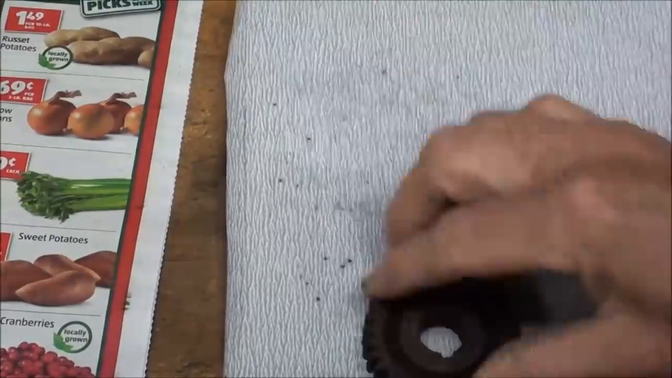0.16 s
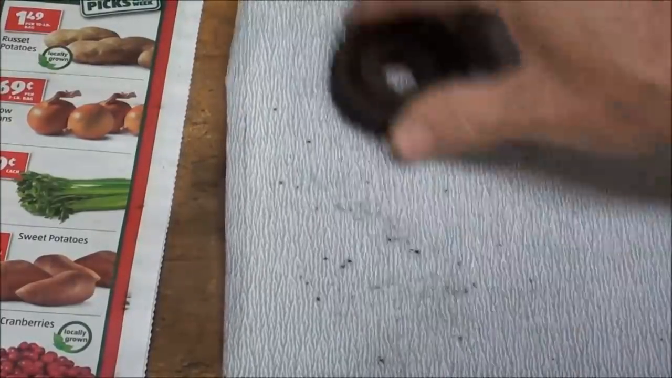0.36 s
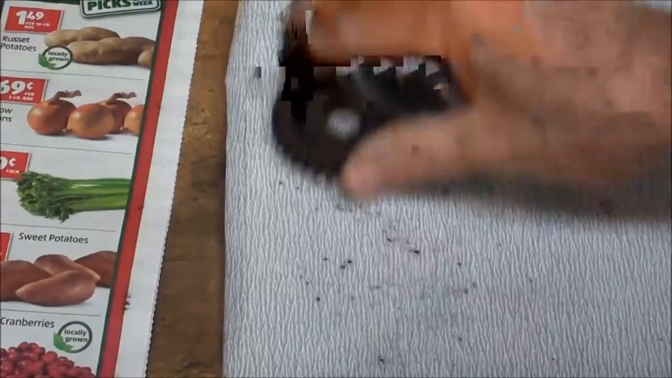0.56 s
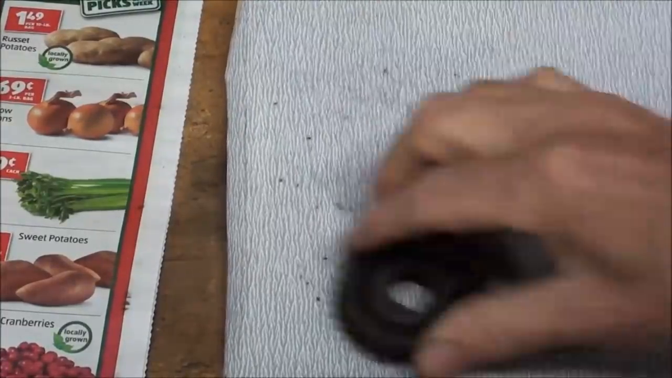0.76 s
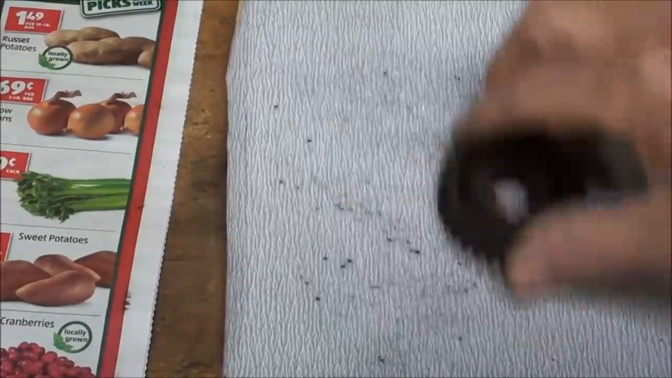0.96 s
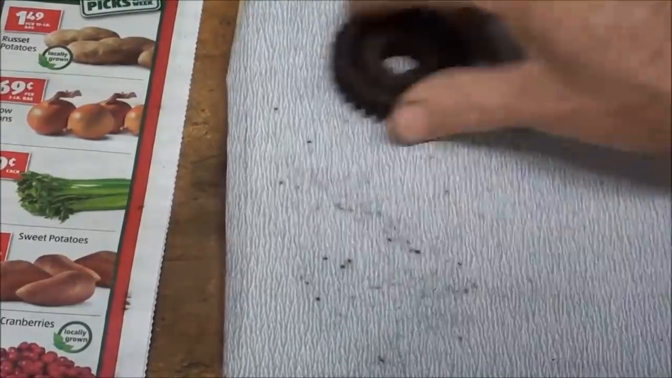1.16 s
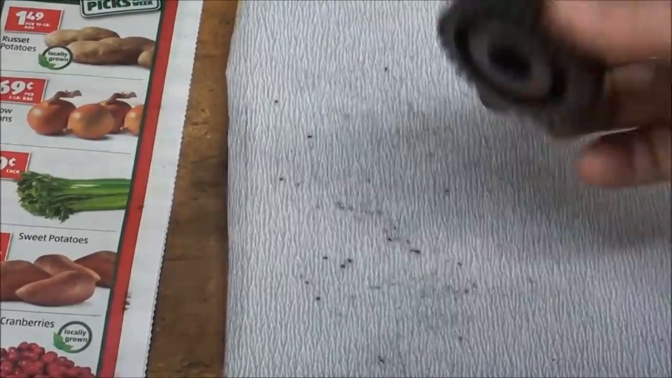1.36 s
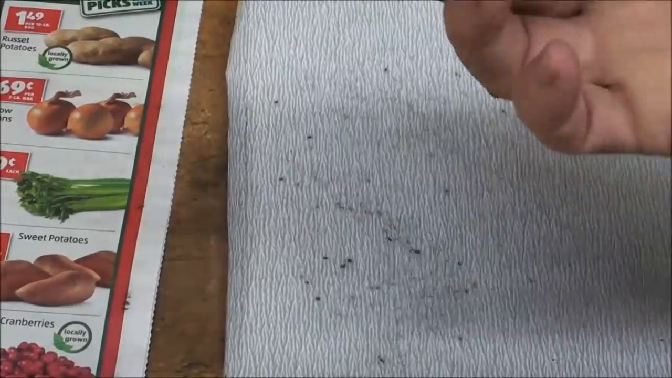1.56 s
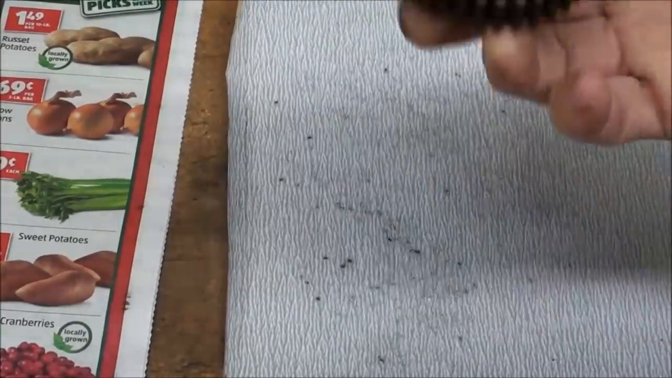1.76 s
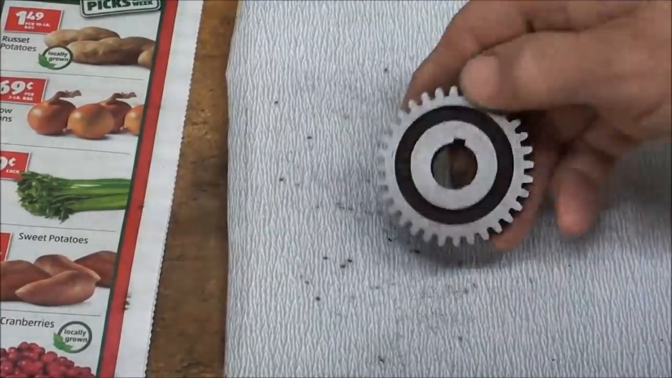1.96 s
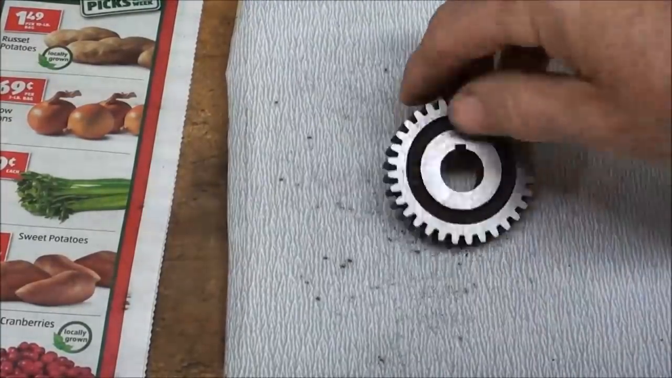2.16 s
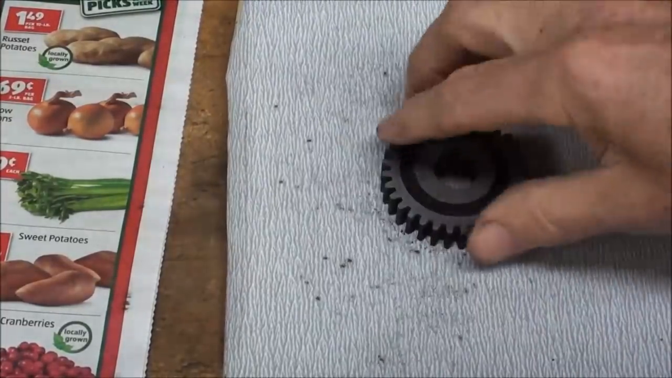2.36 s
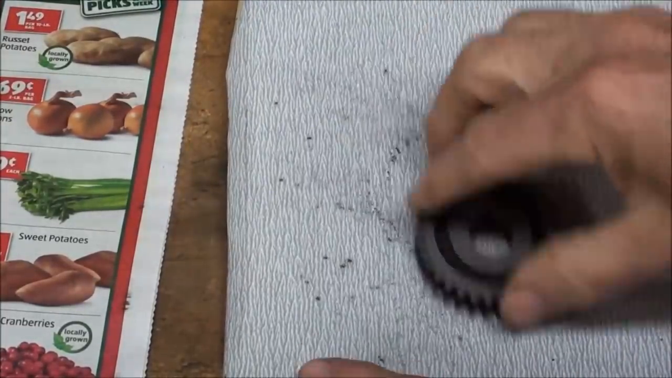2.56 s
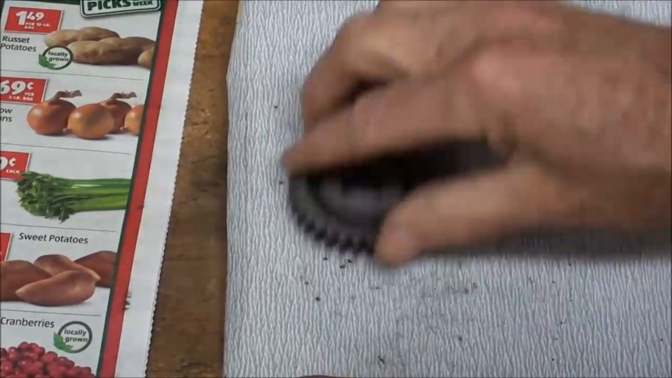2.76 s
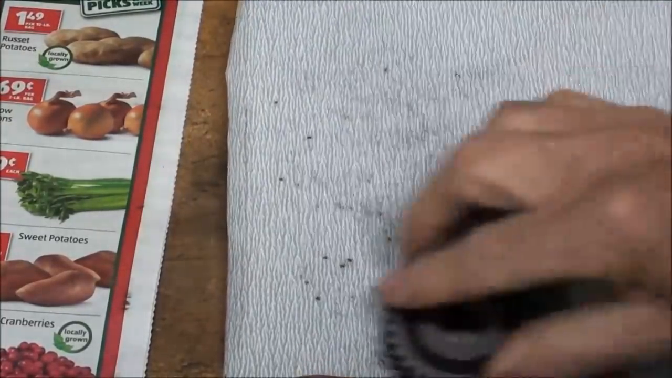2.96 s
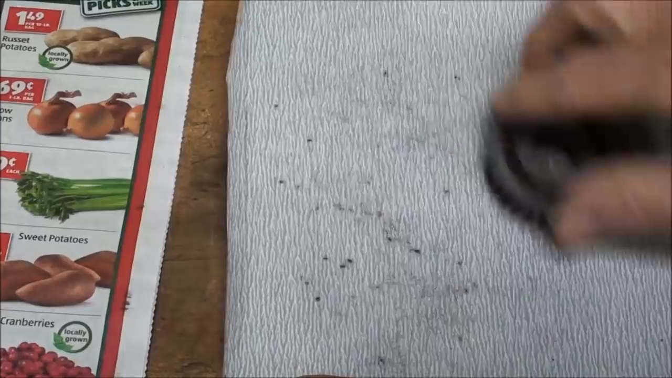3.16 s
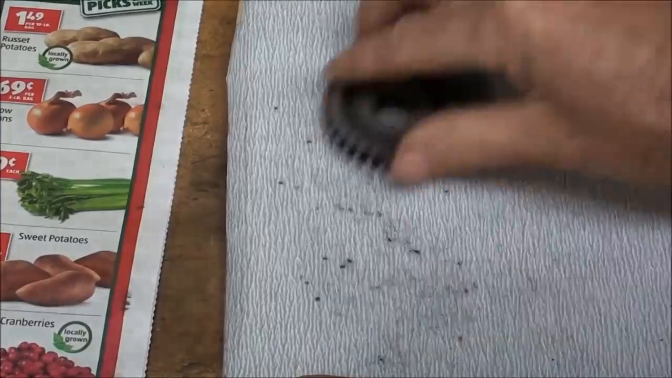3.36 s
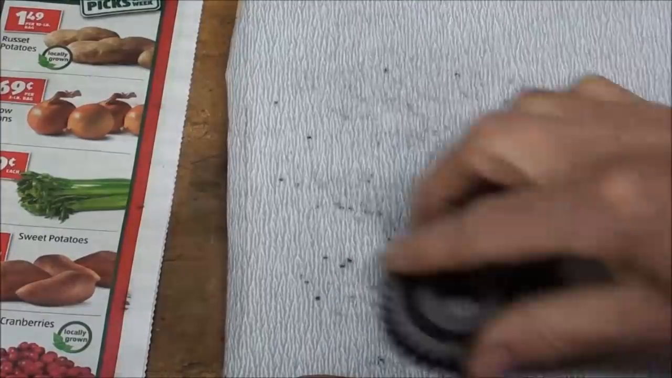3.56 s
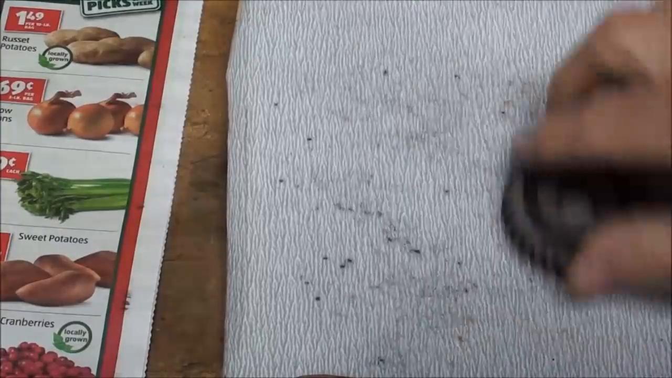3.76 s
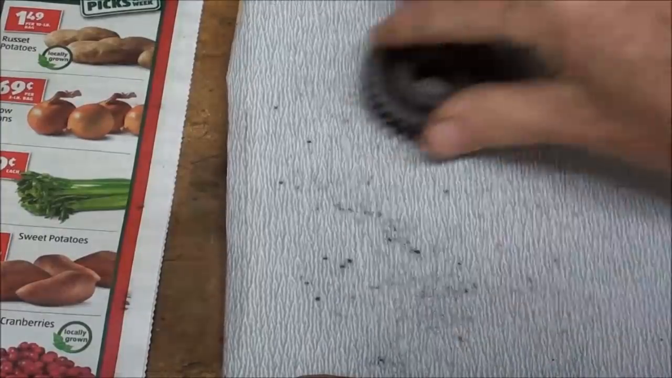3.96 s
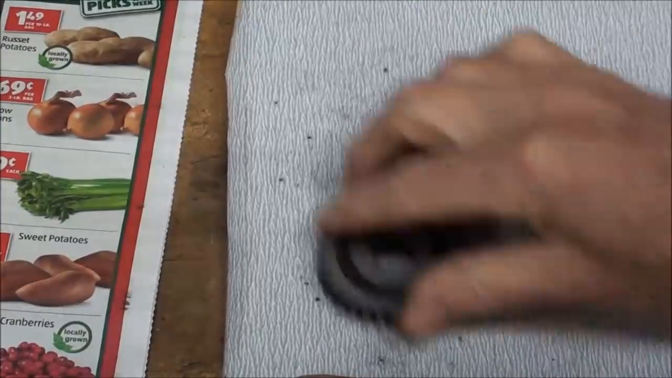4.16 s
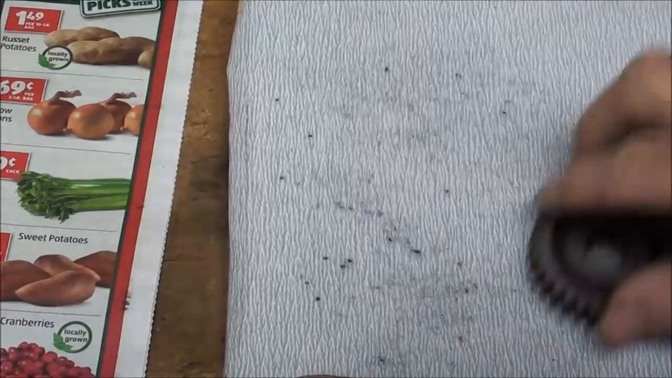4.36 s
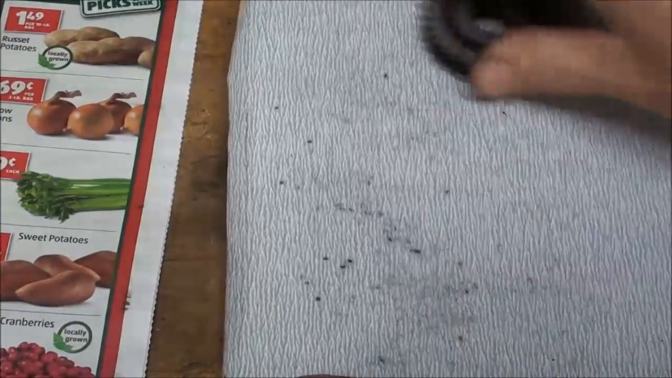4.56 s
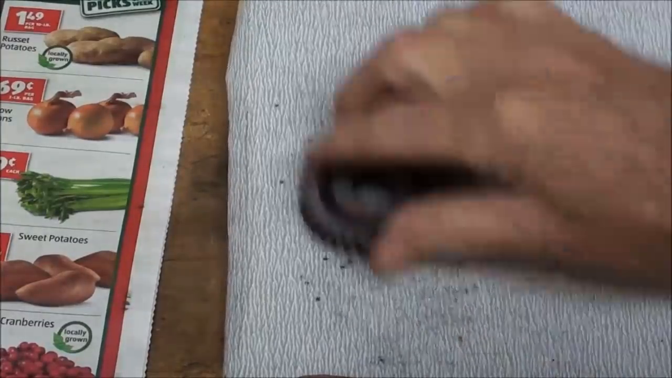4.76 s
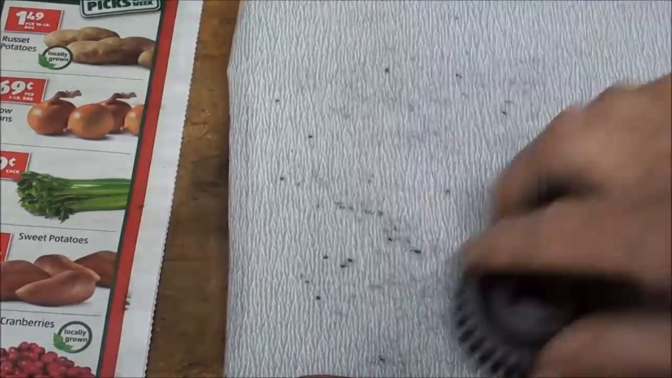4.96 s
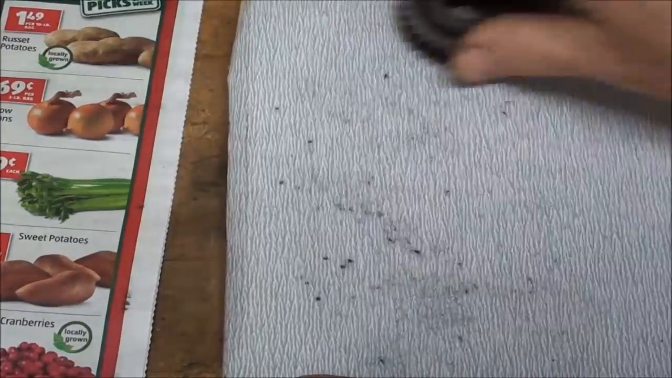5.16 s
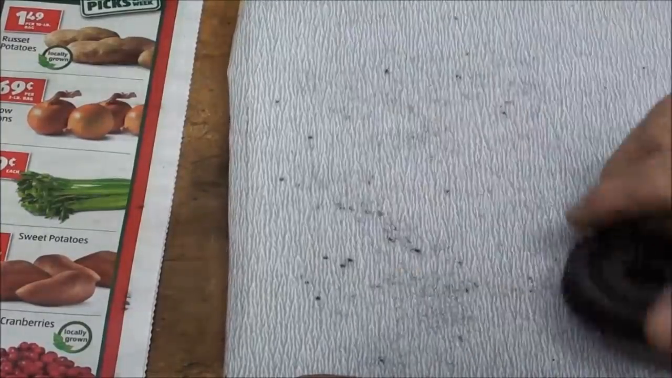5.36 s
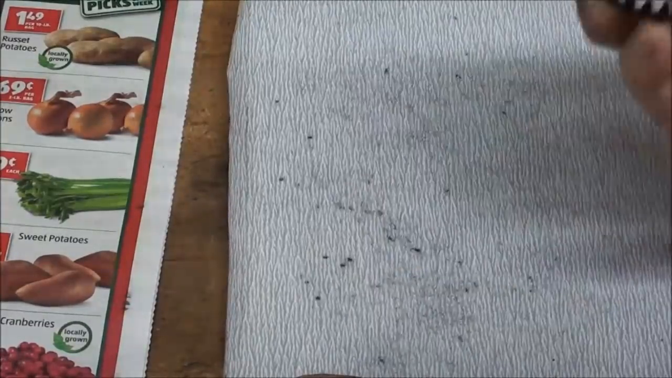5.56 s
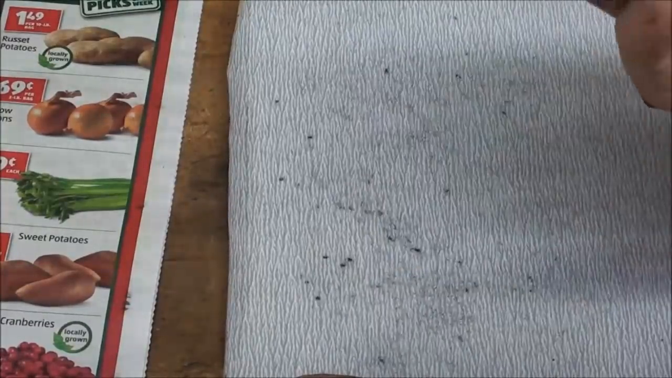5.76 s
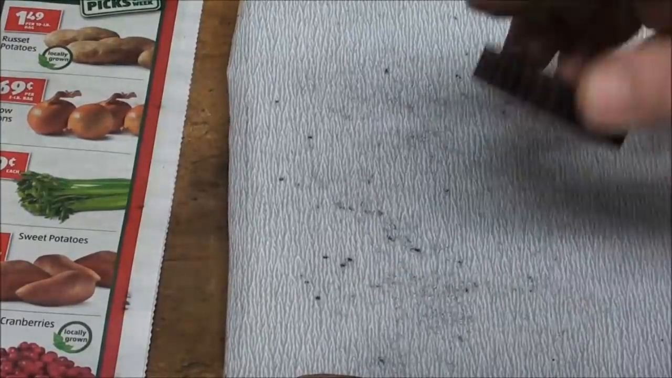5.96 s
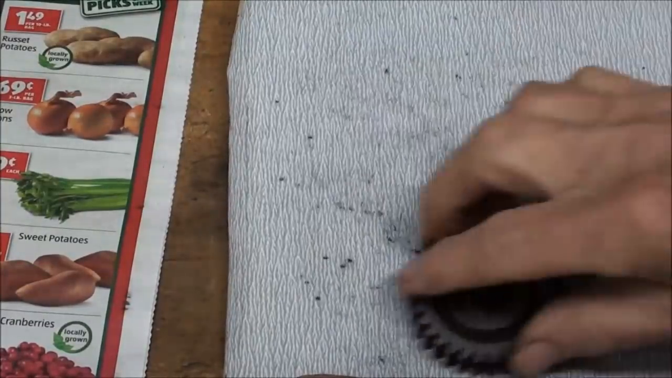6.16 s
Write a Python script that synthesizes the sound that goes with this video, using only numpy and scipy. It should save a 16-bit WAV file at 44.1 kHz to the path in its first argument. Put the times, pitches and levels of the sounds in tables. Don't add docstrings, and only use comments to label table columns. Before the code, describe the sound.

A cast iron gear scrapes in bright, gritty circles on sandpaper, is lifted, knocks back down on a wooden bench, and scrapes again.

```python
import sys
import numpy as np
from scipy import signal
from scipy.fft import rfft, irfft, next_fast_len
from scipy.io import wavfile
from scipy.ndimage import uniform_filter1d, map_coordinates

SR = 44100
rng = np.random.default_rng(int(sys.argv[2]) if len(sys.argv) > 2 else 0)


def volts_from_db(level):
    exponent = np.asarray(level, float) / 20
    return 10 ** exponent


def master(y):
    cut = np.clip(np.atleast_2d(y).T, -1, 1)
    pcm = np.round(cut * 32767)
    wavfile.write(sys.argv[1], SR, pcm.astype(np.int16))


N = 274743
TIME = np.arange(N) / SR

# time_s, pressure_db, speed_db
RUBS = [
    [(0, -14.5, -3), (.15, -14.5, -2.5), (.6, -14, -4.5), (1.24, -15, -5), (1.275, -20.5, -10),
     (1.31, -65, -18)],
    [(2.522, -46, -3), (2.543, -24, -4), (2.61, -12.5, -12), (2.73, -14.5, -8.5), (2.9, -15, -4),
     (5.2, -14.5, -3.5), (5.34, -13, -8), (5.365, -21, -11), (5.395, -42, -15)],
    [(6.131, -19, -22), (6.17, -17.5, -7), (6.23, -15, -8)],
]
# pitch_hz, width_hz, level_db
BOARDS = [(162.4, 8.5, 4.5), (220, 83, 3), (287, 125, -5), (400, 23, -2), (464, 75, 0), (547.5, 52, -5.5),
          (621.6, 78, -2.5), (701.2, 50.4, -1.5), (874, 133, -2.5), (990, 110, 0.5), (1115, 113, -1),
          (1183, 94, 0.5), (1256, 150, -3), (1392, 45, -3), (1570, 93, -4), (1697, 190, -2.5),
          (1950, 160, -9.5)]


def scratch():
    # time_s, depth_db, width_s
    stall_points = [
        (0.075, 9, 0.0099),
        (0.217, 14, 0.0086),
        (.362, 9, .009),
        (.49, 4, 0.013),
        (2.575, 2, 0.0098),
        (2.665, 5, 0.038),
    ]
    # pitch_hz, level_db
    hiss_shape = [(880, -45.5), (1500, -21.5), (2120, -19), (2660, -16.5), (2860, -16.5), (4330, -10),
                  (5380, -3.5), (6000, -3.5), (7030, -2), (9100, 0), (10900, -1.5), (15100, -8),
                  (16000, -15.5)]
    # pitch_hz, width_hz, level_db
    gear_rings = [(2538, 57, -32.5), (2912, 550, -25.5), (3700, 83, -59), (5290, 270, -32),
                  (7000, 1000, -27)]

    stalls = sum(db * hump(s, width, width) for s, db, width in stall_points)
    slowing = sum(db * hump(s - 0.021, 0.025, 0.025) for s, _, _, db in turn_table())
    speed_db = along(RUBS, order=2) - slowing
    pressure_db = along(RUBS, order=1)

    second_s, third_s = RUBS[1][0][0], RUBS[2][0][0]
    later_worn_s = np.where(TIME < third_s, TIME - second_s, TIME)
    worn_s = np.where(TIME < second_s, TIME + 2, later_worn_s)
    coarse_db = -16.5 - 0.38 * speed_db - 0.58 * (pressure_db + 15) + 0.36 * stalls
    coarse_db = coarse_db - 1 * (np.minimum(worn_s, 3) - 2)

    grains = grit(30000, 0.74, 0.35)
    grains = grains + sum(volts_from_db(db + 5.3 * wander(0.018)) * resonate(grains, hz, width)
                          for hz, width, db in gear_rings)
    hiss = coloured(hand_echo(grains),
                    lambda hz: read(hiss_shape, hz) - 30 * np.clip(1500 / (hz + 1) - 1, 0, 2))
    rasp = coloured(hiss, lambda hz: -10 * np.log10(1 + (hz / 4000) ** 10))
    top = coloured(hiss, lambda hz: -10 * np.log10(1 + (11000 / (hz + 1)) ** 10))
    blend = evened(hiss - rasp - top)
    blend = blend + volts_from_db(speed_db - 0.64 * stalls) * evened(top)
    blend = blend + volts_from_db(coarse_db) * evened(rasp)
    return touching(RUBS) * volts_from_db(pressure_db - stalls + 0.83 * wander(0.02)) * blend


def turn_table():
    # time_s, high_boards_db, build_up_s, speed_lost_db
    turn_rows = [(.245, -21.5, 0.028, 11), (.53, -28.5, 0.035, 4), (.7, -29.5, .04, -1),
                 (.79, -35, 0.025, 4.5), (.91, -39, 0.045, -0.5), (1.085, -30, 0.056, 5),
                 (3.02, -32, 0.029, 5), (3.3, -23, 0.035, 6), (3.595, -21, 0.032, 7), (3.88, -27, 0.058, 6),
                 (4.169, -24.5, 0.065, 4.5), (4.484, -26.5, 0.08, 1.5), (4.765, -25, 0.065, 5),
                 (5.045, -24, 0.049, 6), (5.19, -27, 0.021, -0.5)]
    return turn_rows


def grit(per_s, spread_db, flicker_db):
    happens = rng.random(N) < per_s / SR
    clicks = rng.standard_normal(N) * volts_from_db(spread_db * rng.standard_normal(N)) * happens
    return evened(clicks * volts_from_db(flicker_db * wander(0.0027) + 0.5 * wander(0.057)))


def hand_echo(x):
    late_samples = 0.00055 * SR * (1 + 0.1 * wander(0.048))
    return x + volts_from_db(-16) * map_coordinates(x, [np.arange(N) - late_samples], order=3)


def touching(tables):
    return sum((TIME >= rows[0][0]) & (TIME <= rows[-1][0] + 400 / SR) for rows in tables)


def bench():
    # time_s, low_boards_db, length_s, boards_centre_hz
    lean_rows = [(0.03, -26.5, 0.029, 645), (0.332, -35.5, 0.1, 646), (0.588, -36, 0.038, 530),
                 (0.674, -23.5, 0.032, 570), (0.878, -28, 0.05, 564), (1.182, -35, .05, 550),
                 (2.675, -33.5, 0.032, 465), (2.865, -31.5, .03, 495), (2.987, -36.5, .04, 600),
                 (3.126, -31, 0.055, 545), (3.28, -31, .04, 676), (3.448, -32.5, 0.038, 605),
                 (3.727, -35.5, 0.13, 634), (4.05, -36.5, 0.1, 653), (4.285, -35, 0.054, 640),
                 (4.57, -36, 0.11, 620), (4.91, -29.5, 0.05, 605), (5.136, -30, 0.058, 600),
                 (5.24, -30, 0.036, 610)]
    # time_s, level_db, rise_s, fall_s, pitch_hz
    squeak_rows = [
        (2.64, -26, 0.024, 0.036, 2505),
        (2.79, -37, .03, 0.02, 2515),
        (2.95, -34, 0.036, .035, 2885),
        (3.25, -36, .035, .03, 2895),
    ]

    lightness_db = 0.5 * np.minimum(along(RUBS, order=1) + 16, 0)
    shake = grit(1500, 3.16, 2.7) * touching(RUBS[:2]) * volts_from_db(lightness_db)

    leans = [volts_from_db(db) * cusp(s, length, length) for s, db, length, _ in lean_rows] + [volts_from_db(-42)]
    centres_hz = [row[-1] for row in lean_rows] + [600]
    centre_hz = sum(g * hz for g, hz in zip(leans, centres_hz)) / sum(leans)
    low = boards(shake * sum(leans), centre_hz, 0.33, BOARDS[2:9])

    turns = volts_from_db(-38.5) + sum(volts_from_db(db) * cusp(s, build, 0.011) for s, db, build, _ in turn_table())
    high = boards(shake * turns, 1154 * (1 + 0.15 * wander(0.017)), 0.56, BOARDS[8:])

    edge = rng.standard_normal(N)
    squeak = sum(volts_from_db(db) * resonate(edge * hump(s, rise, fall), hz, 50)
                 for s, db, rise, fall, hz in squeak_rows)
    return low + high + squeak


def boards(drive, centre_hz, reach, modes=BOARDS):
    centre_hz = np.maximum(centre_hz, 50)
    share = [volts_from_db(db - 5 * (np.log2(hz / centre_hz) / reach) ** 2) for hz, _, db in modes]
    total = np.sqrt(sum(g ** 2 for g in share))
    return sum(resonate(drive * g / total, hz, width) for g, (hz, width, _) in zip(share, modes))


def knocks():
    # time_s, boards_db, boards_centre_hz, crack_db, rattle_t60_s
    edge_down = [
        (2.0805, -4, 400, 2.5, .017),
        (2.082, -7, 1050, -15, 0.036),
        (2.083, -11, 432, -49, 0.14),
    ]
    face_down = [
        (2.240, -13.5, 625, -14.5, 0.31),
        (2.256, -37, 1100, -12, 0.15),
        (2.277, -28, 500, -13.5, 0.24),
        (2.297, -16.5, 367, -28, 0.3),
    ]
    slid_down = [
        (6.1312, -4.5, 1230, -12, 0.15),
        (6.14, -15, 2000, -39, 0.18),
        (6.136, -12, 470, -42, 0.19),
        (6.14, -18, 216, -42, 0.26),
    ]

    out = np.zeros(N)
    for crack_top_hz, rows in zip((1490, 3570, 2400), (edge_down, face_down, slid_down)):
        for s, board_db, centre_hz, crack_db, t60 in rows:
            sign, size = rng.standard_normal((2, SR // 2))
            rattle = struck(evened(sign * volts_from_db(2.5 * size)), t60, 0.001, 0.2)
            crack = coloured(rattle, lambda hz: -10 * np.log10(
                (1 + (hz / crack_top_hz) ** 5.7) * (1 + (250 / (hz + 1)) ** 4)))
            add(out, s, volts_from_db(board_db) * boards(rattle, centre_hz, 0.65) + volts_from_db(crack_db + 8) * crack)
    return out


def struck(noise, t60, rise, blow):
    t = TIME[:SR // 2]
    kick = blow * np.sqrt(t60 * SR / np.log(10 ** 6)) * (np.arange(SR // 2) == 8)
    return kick + noise * (1 - np.exp(-t / rise)) * volts_from_db(-60 * t / t60)


def fingers():
    # time_s, peak_db, centre_hz, width_hz, t60_s
    tick_rows = [(1.3988, -25.5, 8100, 8900, .017), (1.3992, -30, 2830, 1350, .013),
                 (1.4002, -25.5, 4560, 1850, .021), (1.642, -44, 4100, 3900, .021),
                 (2.1642, -40, 2520, 310, .06), (2.1648, -37, 7600, 2600, .025),
                 (2.1652, -39, 5000, 610, .045), (2.381, -38, 7800, 5900, .021),
                 (5.482, -35, 6500, 4100, 0.031), (5.9852, -32, 4450, 1600, .016),
                 (5.9858, -41, 7600, 4100, .011), (5.9862, -43, 2510, 500, .028)]
    # time_s, peak_db, centre_hz, width_hz, t60_s
    ring_rows = [(2.0795, -14.5, 7200, 950, 0.016), (2.0805, -25, 10200, 4100, 0.021),
                 (2.0814, -21.5, 3960, 3020, 0.063), (2.19, -54, 9860, 100, 0.72),
                 (2.2388, -21, 7600, 4000, .012), (2.2423, -15.5, 5260, 1100, 0.18),
                 (2.2427, -14, 2670, 1250, 0.19), (2.2432, -29.5, 9900, 150, 0.12),
                 (2.284, -9, 7200, 1250, 0.019), (2.3032, -28, 10600, 2500, 0.01),
                 (6.1301, -7.5, 6400, 4100, 0.015)]
    # time_s, peak_db, centre_hz, width_hz, t60_s
    bump_rows = [(.245, -33, 1200, 300, 0.041), (.401, -39.5, 170, 140, .11),
                 (.685, -25.5, 550, 400, 0.071), (1.675, -27, 187, 130, 0.13),
                 (3.15, -23.5, 580, 250, .073), (3.298, -28, 1190, 150, .032), (3.585, -23, 1170, 130, .05),
                 (3.861, -19.5, 1230, 200, .049), (4.149, -28, 1190, 130, .05),
                 (4.851, -33, 200, 126, 0.32), (4.92, -23, 590, 200, .042), (5.03, -19.5, 1170, 150, .04),
                 (5.166, -37, 1180, 200, .046), (5.381, -40, 226, 150, 0.52)]
    # time_s, level_db, length_s, centre_hz, width_hz
    brush_rows = [
        (1.423, -44, 0.051, 2800, 4070),
        (1.347, -46.5, 0.12, 4970, 6000),
        (1.76, -47.5, 0.055, 3380, 5000),
        (1.952, -48, 0.069, 4760, 6000),
        (2.457, -33, 0.022, 7000, 5000),
        (2.488, -45, .005, 8000, 6000),
        (5.43, -46, 0.074, 5850, 6030),
    ]

    out = np.zeros(N)
    for s, db, hz, width, t60 in tick_rows + ring_rows + bump_rows:
        puff = struck(rng.standard_normal(SR // 2), t60, 0.00061, 0.77)
        add(out, s, volts_from_db(db) * resonate(puff, hz, width))
    noise = rng.standard_normal(N)
    for s, db, length, hz, width in brush_rows:
        swell = np.exp(-2 * ((TIME - s) / length) ** 2)
        out = out + volts_from_db(db) * swell * resonate(noise, hz, width)
    return out


def room(x):
    # pitch_hz, t60_s
    echo_times = [(200, 0.22), (1000, 0.33), (4000, 0.33), (8000, 0.23), (14000, 0.059)]
    taps = rng.choice([-1., 1.], SR // 2) * (rng.random(SR // 2) < 8000 / SR)
    taps[:200] = 0
    hz, t, z = signal.stft(taps, SR, nperseg=256)
    fade = volts_from_db(-60 * t / read(echo_times, hz)[:, None])
    tail = signal.istft(z * fade, SR, nperseg=256)[1]
    return signal.fftconvolve(x, tail / np.linalg.norm(tail))[:N]


def shop():
    # pitch_hz, level_db
    air_shape = [(18, -43), (30, -28), (124, -10), (157, -12), (303, -10), (374, -14), (526, -11),
                 (684, -20), (889, -17), (1320, -24.5), (2010, -26.5), (3580, -30.5), (4650, -33),
                 (6050, -32.5), (16000, -39)]
    # pitch_hz, likeness (0 to 1)
    side_likeness = [(60, 0.95), (240, 1), (950, 0.74), (3800, 0.41), (5500, 0.61), (8000, 0.98)]
    # pitch_hz, left_minus_right_db
    left_lead = [(60, 0.5), (240, 0.4), (950, 1.15), (3770, 0), (15000, 0.0)]
    # pitch_hz, width_hz, level_db
    hum_rows = [(65.93, 13, -54.5), (121, 28, -57), (250, 15, -61.5), (307, 25, -46.5), (506.5, 37, -53.5),
                (596, 18, -54.5), (839, 23, -58), (4650, 650, -57)]

    def same(hz):
        return np.clip(read(side_likeness, hz), 0.01, 0.999)

    left, other = rng.standard_normal((2, N))
    right = coloured(left, lambda hz: 20 * np.log10(same(hz)) - read(left_lead, hz))
    right = right + coloured(other, lambda hz: 10 * np.log10(1 - same(hz) ** 2) - read(left_lead, hz))
    air = np.array([coloured(c, lambda hz: read(air_shape, hz)) for c in (left, right)])
    air = volts_from_db(-41.5 + 0.46 * wander(0.063)) * evened(air)
    hums = sum(volts_from_db(db + 1.65 * wander(0.085)) * resonate(rng.standard_normal(N), hz, width)
               for hz, width, db in hum_rows)
    return air + hums * volts_from_db([[0.5], [-0.6]])


def evened(x):
    return x / np.sqrt(np.mean(x ** 2) + 1e-20)


def read(points, hz):
    f, value = np.transpose(points)
    return np.interp(np.log(hz + 1), np.log(f + 1), value)


def coloured(x, db_of_hz):
    size = next_fast_len(len(x), True)
    gain = volts_from_db(db_of_hz(np.fft.rfftfreq(size, 1 / SR)))
    return irfft(rfft(x, size) * gain, size)[:len(x)]


def along(tables, order):
    rows = np.vstack(tables)
    return np.interp(TIME, rows[:, 0], rows[:, order])


def resonate(x, hz, width):
    r = np.exp(-np.pi * width / SR)
    pole = [1, -r * np.exp(2j * np.pi * min(hz, SR / 2) / SR)]
    gain = np.sqrt(2 * (1 - r * r) ** 3 / (1 + r * r))
    return gain * signal.lfilter([1], np.convolve(pole, pole), x).real


def wander(seconds):
    coarse = TIME[::32]
    size = max(round(seconds * len(coarse) / TIME[-1]), 1)
    smooth = uniform_filter1d(uniform_filter1d(rng.standard_normal(len(coarse)), size), size)
    return np.interp(TIME, coarse, evened(smooth))


def add(mix, s, sound):
    part = mix[round(s * SR):][:len(sound)]
    part += sound[:len(part)]


def hump(s, rise, fall):
    return np.exp(-0.5 * ((TIME - s) / np.where(TIME < s, rise, fall)) ** 2)


def cusp(s, rise, fall, sharp=1.21):
    return np.exp(-(abs(TIME - s) / np.where(TIME < s, rise, fall)) ** sharp)


def scene():
    # pitch_hz, side_minus_mid_db
    rub_spread = [(60, -52), (110, -51.5), (200, -65), (380, -54), (700, -13.5), (1290, -49), (2380, -16.5),
                  (4400, -19.5), (8120, -12), (15000, -31)]
    # pitch_hz, side_minus_mid_db
    hit_spread = [(60, -34), (180, -28), (550, -23), (1650, -25), (4970, -22.5), (15000, -35)]

    rub = scratch() + bench()
    hits = knocks() + fingers()
    dull_hits = coloured(hits, lambda hz: -10 * np.log10(1 + (hz / 4500) ** 3))
    mid = rub + hits + volts_from_db(-16.5) * room(rub) + volts_from_db(-14) * room(dull_hits)
    side = coloured(room(rub) * volts_from_db(1.5 * wander(0.015)), lambda hz: read(rub_spread, hz) - 4)
    side = side + coloured(2.2 * hits + room(hits), lambda hz: read(hit_spread, hz) + 1.2)

    power_db = 10 * np.log10(abs(uniform_filter1d(mid ** 2, size=800)) + 1e-12)
    recovery = TIME * 510
    over_db = np.maximum(np.maximum.accumulate(power_db + recovery) - recovery + 24, 0)
    return np.array([mid + side, mid - side]) + shop() * volts_from_db(-0.5 * over_db)


def roll_off(x):
    return signal.sosfilt(signal.butter(12, 16700, fs=SR, output="sos"), x)


def record(dry):
    thinned = signal.sosfilt(signal.butter(2, 60 / (SR / 2), "high", output="sos"), dry)
    limited = 1.15 * np.tanh(thinned / 1.15)
    edge_filter = signal.firwin(511, 15900, window=("kaiser", 9), fs=SR)
    cut = signal.oaconvolve(limited, edge_filter[None], "same")
    return roll_off(np.clip(cut, -1, 1))


dry = scene()
out = record(dry)
master(out)
```